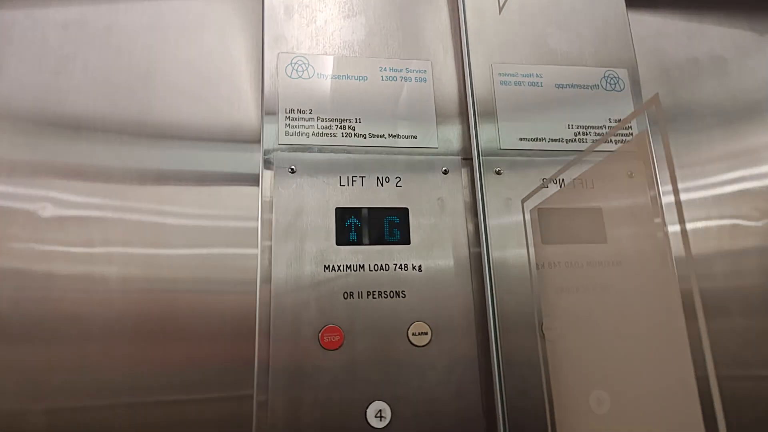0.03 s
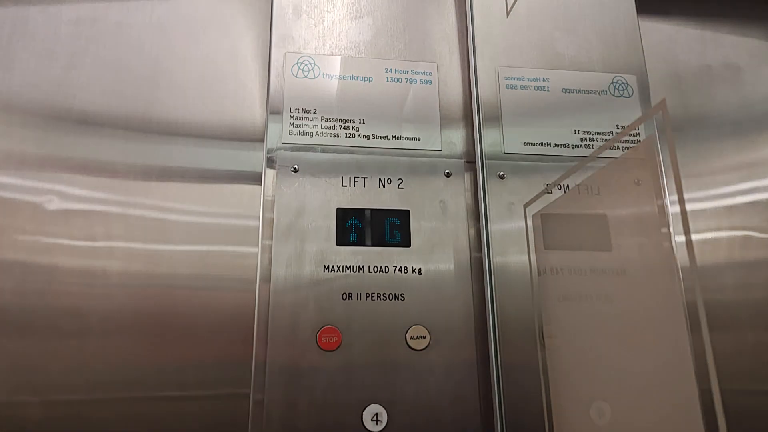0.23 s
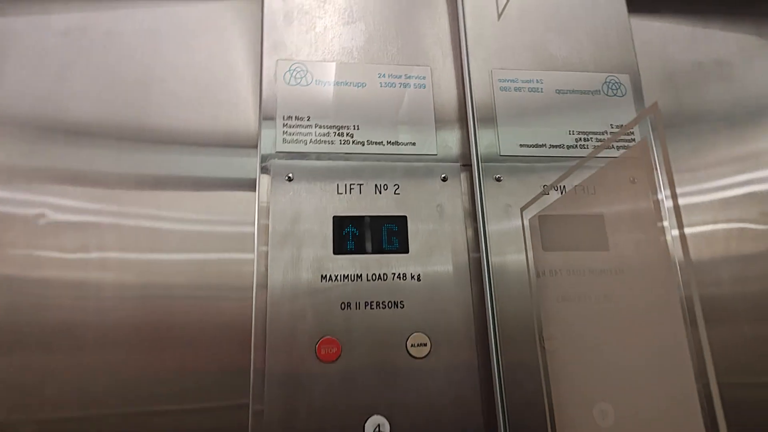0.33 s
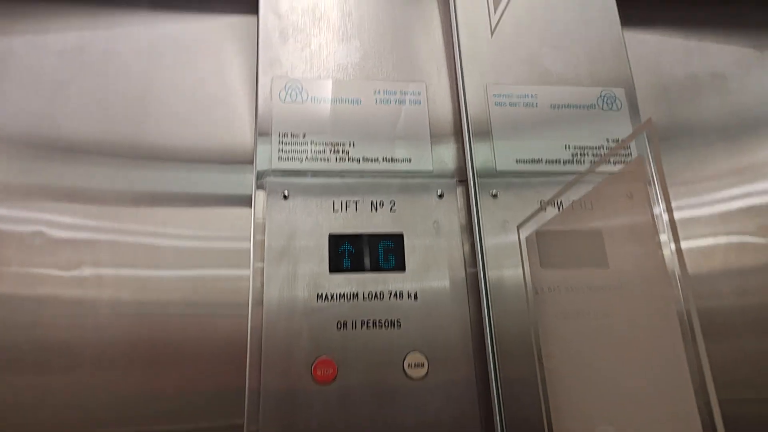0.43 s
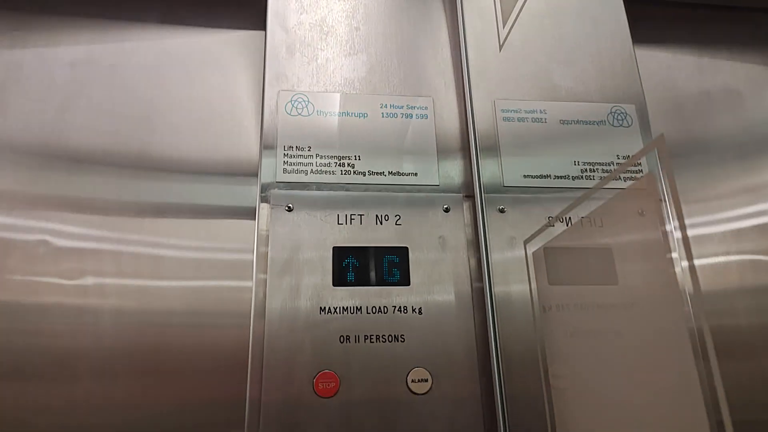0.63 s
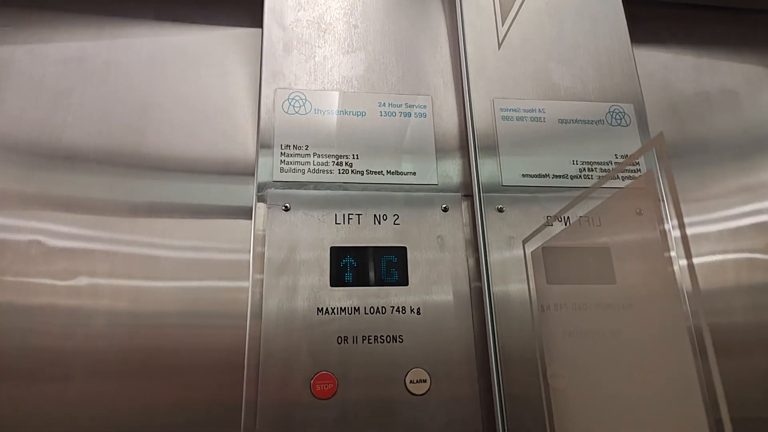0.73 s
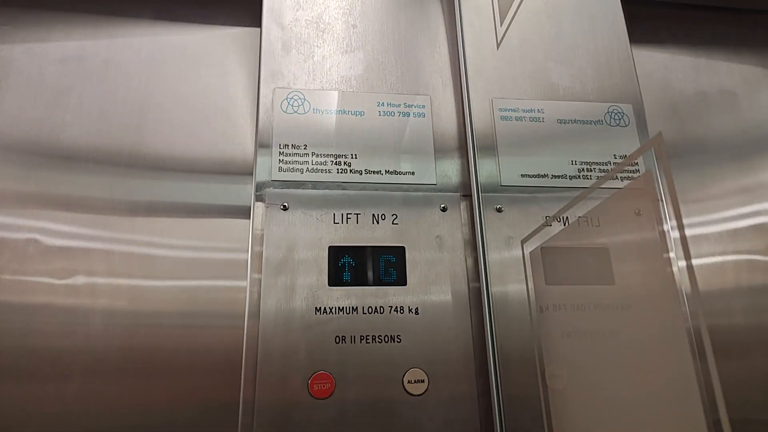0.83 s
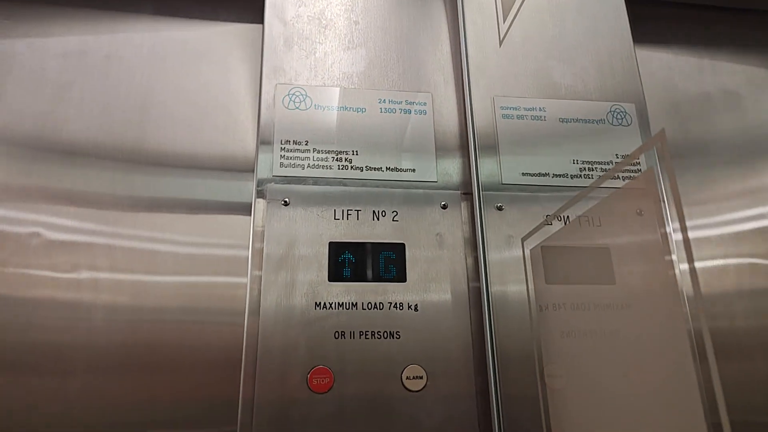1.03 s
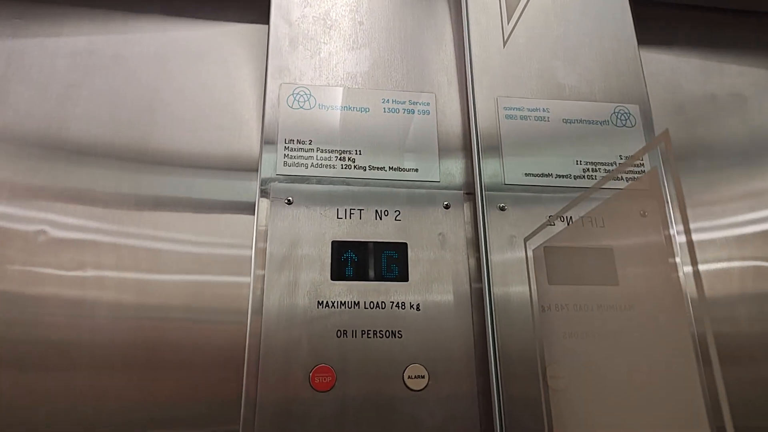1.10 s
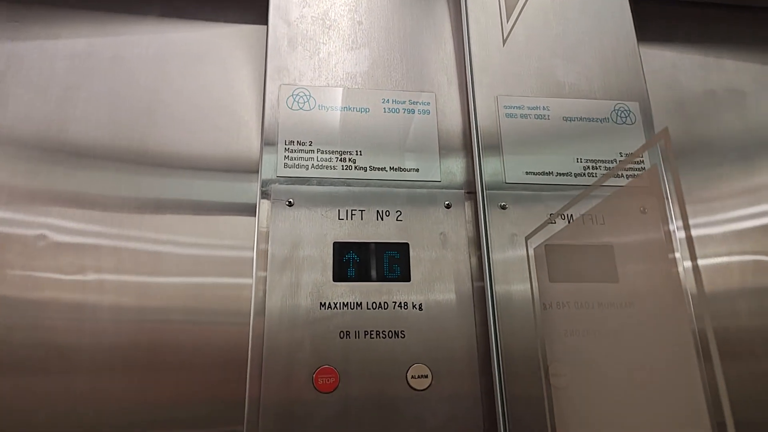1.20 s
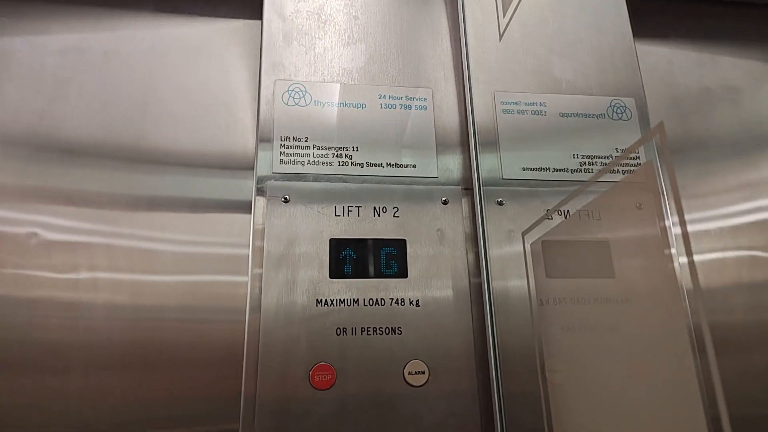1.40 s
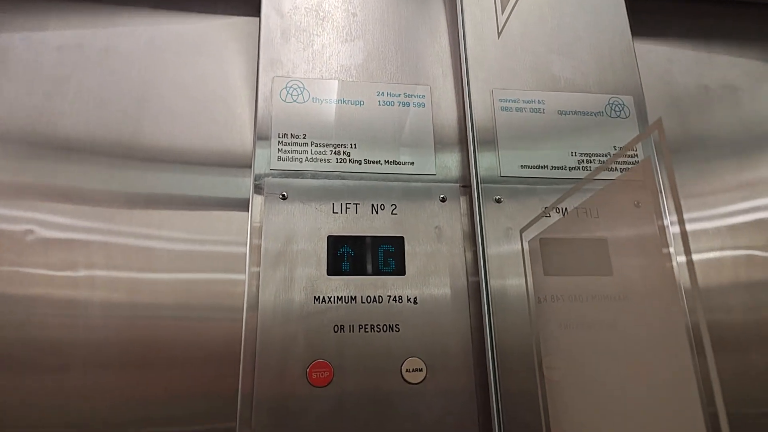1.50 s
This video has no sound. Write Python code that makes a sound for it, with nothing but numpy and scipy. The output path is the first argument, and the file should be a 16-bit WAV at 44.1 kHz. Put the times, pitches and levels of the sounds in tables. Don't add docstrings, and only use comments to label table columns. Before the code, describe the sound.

Elevator doors bang closed in two heavy clanking blows, then low swaying rumble and faint fan

```python
import sys
import numpy as np
from scipy import signal
from scipy.fft import rfft, irfft
from scipy.io import wavfile
from scipy.ndimage import uniform_filter1d

SR = 44100
rng = np.random.default_rng(int(sys.argv[2]) if len(sys.argv) > 2 else 0)


def inscribe(sig):
    pcm = np.round(np.clip(np.atleast_2d(sig).T, -1, 1) * 32767)
    wavfile.write(sys.argv[1], SR, pcm.astype(np.int16))


def rack_gain(trim_db):
    fader = np.asarray(trim_db, float)
    return 10 ** (fader / 20)


N = 68355

# [t/s, panel thud level/dB, mid crash level/dB, treble rattle level/dB, crash t60/s]
DOOR_BLOWS = [(0.144, -44, -50.5, -60, 0.57), (0.177, -39.5, -46.5, -35.5, 0.34),
              (0.196, -23, -37.5, -35.5, 0.44), (0.213, -9.5, -17, -15, 0.44),
              (.236, -14, -21, -27.5, 0.25), (0.257, -11, -35.5, -22.5, 0.22),
              (0.304, -12, -29.5, -33, 0.42), (0.388, -8, -17.5, -16.5, 0.19),
              (0.4, -17.5, -18.5, -16, 0.39), (.447, -17.5, -21.5, -13.5, 0.33),
              (0.465, -30, -25.5, -21, 0.47), (0.496, -18.5, -30, -25.5, 0.52),
              (0.535, -26, -26, -17.5, 0.4), (.572, -26.5, -73, -47, 1), (0.624, -25.5, -69, -69, .6)]
# [f/Hz, level/dB, t60/s]
PANEL_MODES = [(69.25, -7, 0.52), (86.6, -7.5, 0.52), (196.6, -10.5, 0.55), (226.8, -16.5, 0.73),
               (250.6, -10, 0.61), (286.9, -1, 0.35), (342.3, -14.5, 0.44), (425, -12.5, 0.27),
               (532.4, -9, 0.081), (638, -7, 0.31), (694, -3.5, 0.075), (812, -14, .15), (931, -6.5, 0.11),
               (1066, -20, 0.2)]
# [f/Hz, level/dB]
CRASH_COLOUR = [(150, -15.5), (300, 11.5), (700, 0), (1200, 3), (2200, 1.5), (3500, -4), (6000, -1),
                (11000, -3)]
# [centre t/s, length/s, f/Hz, level/dB]
ROPE_LURCHES = [(0.253, 0.075, 41.8, -9), (0.319, 0.17, 31.6, -18.5), (0.445, 0.15, 40.6, -14),
                (0.529, 0.19, 39.8, -11.5), (0.642, 0.066, 38.4, -5), (0.697, 0.088, 35.5, -15.5),
                (0.771, 0.074, 29.3, -18.5), (.84, 0.1, 35.9, -16.5), (0.903, 0.077, 35.4, -17),
                (0.958, 0.073, 39.6, -28), (1.024, 0.12, 35.3, -31), (1.084, 0.091, 36.7, -26.5),
                (1.145, 0.082, 39.7, -27), (1.209, 0.037, 33.3, -33), (1.258, 0.059, 38, -32),
                (1.319, 0.053, 34.9, -42)]
# [centre t/s, length/s, f/Hz, level/dB]
AIR_BOOMS = [(.25, 0.046, 141, -24.5), (.33, 0.16, 135.7, -23), (.405, 0.034, 141, -17),
             (.485, 0.11, 135, -15.5), (.57, 0.14, 135.8, -21), (.66, .12, 136.2, -24.5),
             (.74, 0.24, 149, -39), (.83, 0.13, 149.4, -41.5), (1.0, 0.31, 141, -57)]
# [t/s, centre f/Hz, width/Hz, peak level/dB]
METAL_TICKS = [
    (.095, 1800, 3500, -42),
    (.192, 600, 500, -33),
    (.888, 8500, 2500, -46),
    (1.0905, 900, 1700, -45),
]
# [t/s, length/s, centre f/Hz, width/Hz, level/dB]
RUSTLES = [
    (.094, .02, 2500, 5000, -58),
    (.96, .1, 1600, 900, -66),
    (1.508, .05, 2400, 2200, -60),
    (1.096, .04, 5300, 1800, -65),
    (1.118, .021, 4200, 2400, -59),
]
# [f/Hz, level/dB per Hz]
FAN_COLOUR = [(20, -14), (32, -1), (80, -12.5), (150, -15), (200, -20), (500, -22), (870, -31), (3500, -40)]
# [t/s, level/dB]
FLOOR_GAIN = [(0, 8), (.2, 5), (.7, -10), (.9, -3), (1.0, -1), (1.07, -4.5), (1.2, -5), (1.32, 3),
              (1.55, -2)]
# [f/Hz, level/dB]
LEFT_PORT = [(100, 1), (600, 0), (3000, -0.5), (4600, 3), (5400, 6.5), (6500, -4.5), (8500, -34.5),
             (11000, -52)]
# [f/Hz, level/dB]
RIGHT_PORT = [(300, 1.5), (2500, 3.5), (4200, -1.5), (6000, -14), (7300, -1), (8500, 8), (9800, -3),
              (10700, -23.5)]


def curve(table, t):
    return np.interp(t, *np.array(table, float).T)


def colour(x, table):
    n = 1 << 17
    rows = np.array(table, float)
    hz = np.arange(n // 2 + 1) * SR / n
    db = np.interp(np.log(hz + 1), np.log(rows[:, 0]), rows[:, 1])
    cepstrum = irfft(db * np.log(10) / 20, n)
    cepstrum[1:n // 2] *= 2
    cepstrum[n // 2 + 1:] = 0
    return irfft(rfft(x, n) * np.exp(rfft(cepstrum)), n)[..., :N]


def cut(x, order, hz, kind):
    return signal.sosfilt(signal.butter(order, hz, kind, fs=SR, output="sos"), x)


def band(x, hz, width_hz):
    low_hz = max(np.sqrt(hz ** 2 + width_hz ** 2 / 4) - width_hz / 2, 10)
    return cut(x, 2, [low_hz, min(low_hz + width_hz, SR / 2.2)], "band")


def unit(x):
    return x / np.sqrt(np.mean(x ** 2))


def walk(rate_hz):
    k = int(SR / rate_hz)
    return unit(uniform_filter1d(uniform_filter1d(rng.standard_normal(N), k), k))


def pair(alike_hz):
    mid, side = rng.standard_normal((2, N))
    side = cut(side, 2, alike_hz, "high")
    return np.array([mid - side, mid + side]) / np.sqrt(2)


def decay(t, start, rise, t60):
    u = np.maximum(t - start, 0)
    return (1 - np.exp(-u / rise)) * np.exp(-np.log(1000) * u / t60)


def blow_level(t, column, rise, t60s):
    power = sum((rack_gain(b[column]) * decay(t, b[0], rise, t60)) ** 2 for b, t60 in zip(DOOR_BLOWS, t60s))
    return np.sqrt(power)


def swells(t, table, sag):
    out, level = np.zeros(N), np.zeros(N)
    for mid, length, hz, db in table:
        u = t - mid
        bell = rack_gain(db) * np.exp(-2 * (u / (length / 2)) ** 2)
        out += np.sqrt(2) * bell * np.cos(2 * np.pi * hz * u * (1 - sag * u / length))
        level += bell
    return out, level


def panels(t):
    thud_s, knock_hz, knock_db, side_hz = 0.0058, 480, 8.5, 700
    waver_db, waver_rad = 3.5, 0.71
    clamp_s, clamp_t60_s = 0.57, 1
    ring = np.zeros((2, N))
    push = np.array([decay(t, b[0], thud_s / 4, thud_s * 4) for b in DOOR_BLOWS])
    chance = rng.standard_normal((len(DOOR_BLOWS), 3 * len(PANEL_MODES)))
    for k, (hz, db, t60) in enumerate(PANEL_MODES):
        phase, strength, place = chance[:, 3 * k:3 * k + 3].T
        force = rack_gain(np.array([b[1] if hz < knock_hz else b[2] + knock_db for b in DOOR_BLOWS]))
        hit = force * np.exp(.6j * phase) * rack_gain(2.6 * strength)
        skew = np.exp(1j * np.outer([-1, 1], place) * (hz / side_hz) ** 2)
        drive = (skew * hit) @ push * np.exp(2j * np.pi * hz * t) / (thud_s * SR / 2)
        pole = np.exp(2j * np.pi * hz / SR - np.log(1000) / (t60 * SR))
        waver = rack_gain(waver_db * walk(30)) * np.exp(1j * waver_rad * walk(30))
        ring += rack_gain(db) * (signal.lfilter([1], [1, -pole], drive) * waver).imag
    rumble = blow_level(t, 1, thud_s, [0.6] * len(DOOR_BLOWS))
    rumble = rack_gain(-13) * rumble * unit(band(pair(980), 296, 407))
    return rack_gain(-5 - 60 * np.maximum(t - clamp_s, 0) / clamp_t60_s) * ring + rumble


def crash(t):
    split_hz, bottom_hz, rise_s = 6380, 299, .002
    stop_s, stop_t60_s, patchy_db = 0.63, 1, 0.5
    mids = cut(colour(pair(290), CRASH_COLOUR), 4, split_hz, "low")
    treble = cut(colour(pair(290), CRASH_COLOUR), 4, split_hz, "high")
    mids = cut(mids, 2, bottom_hz, "high")
    stop = rack_gain(-60 * np.maximum(t - stop_s, 0) / stop_t60_s)
    mid_level = blow_level(t, 2, rise_s, [b[4] * 1.082 for b in DOOR_BLOWS])
    treble_level = blow_level(t, 3, rise_s, [b[4] * 0.6 for b in DOOR_BLOWS])
    mids = unit(mids) * stop * mid_level * rack_gain(patchy_db * walk(60))
    return mids + unit(treble) * treble_level * rack_gain(patchy_db * walk(140))


def sway(t):
    shudder_hz, shudder_width_hz, shudder_db = 81.4, 30, -20
    lag_s, follow_power = .06, 0.77
    lurch, level = swells(t, ROPE_LURCHES, 0.25)
    frame = band(rng.standard_normal(N), shudder_hz, shudder_width_hz)
    frame = band(frame, shudder_hz, shudder_width_hz)
    follow = np.maximum(uniform_filter1d(level, int(lag_s * SR)), 0) ** follow_power
    shudder = rack_gain(shudder_db) * follow * unit(frame)
    boom = swells(t, AIR_BOOMS, 0)[0]
    spread = rack_gain(-21) * unit(band(rng.standard_normal(N), 50, 60)) * level
    return lurch + shudder + boom + np.outer([1, -1], spread)


def door_drive(t):
    motor_hz, motor_db, stop_s, fade_s = 100.4, -36, .055, .014
    roll_hz, roll_width_hz, roll_db, roll_end_s = 2220, 1400, -59.5, .21
    hum = np.sin(2 * np.pi * motor_hz * t) + 0.11 * np.sin(np.pi * motor_hz * t)
    hum *= rack_gain(motor_db + 2.6 * walk(30.8)) * np.exp(-np.maximum(t - stop_s, 0) / fade_s)
    roll = unit(band(pair(500), roll_hz, roll_width_hz))
    roll *= rack_gain(roll_db + 5.5 * walk(40)) * (t < roll_end_s)
    return np.sqrt(2) * hum + roll


def ticks(t):
    out = np.zeros((2, N))
    for start, length, hz, width_hz, db in RUSTLES:
        u = (t - start) / length
        shape = np.clip(u * 4.5, 0, 1) * np.exp(-np.maximum(u - 1, 0) * 9.0)
        out += rack_gain(db) * shape * unit(band(pair(555), hz, width_hz))
    for start, hz, width_hz, db in METAL_TICKS:
        click = band((np.arange(N) == int(start * SR)) * 1., hz, width_hz)
        tail = .3 * decay(t, start, .001, .025) * unit(band(pair(600), hz, width_hz))
        out += rack_gain(db) * (click / np.abs(click).max() + tail)
    return out


def air(t):
    fan_db, hiss_db = -53, -60.5
    gain_db = curve(FLOOR_GAIN, t)
    fan = unit(colour(pair(450), list(FAN_COLOUR) + [(7000, -59)])) * rack_gain(fan_db + 0.54 * walk(24))
    hiss = unit(band(pair(300), 7600, 6400)) * rack_gain(hiss_db + gain_db + 0.75 * walk(42))
    return fan * rack_gain(0.53 * gain_db) + hiss


def scene():
    t = np.arange(N) / SR
    return panels(t) + crash(t) + sway(t) + door_drive(t) + ticks(t) + air(t)


def low_pass(x):
    return signal.sosfilt(signal.butter(12, 10730, fs=SR, output="sos"), x)


def record(dry):
    limit, top_hz = 1.25, 10750
    x = np.array([colour(dry[0], LEFT_PORT), colour(dry[1], RIGHT_PORT)])
    x = limit * np.tanh(x / limit)
    x = signal.sosfilt(signal.ellip(10, .3, 60, top_hz, fs=SR, output="sos"), x)
    return low_pass(x)


dry = scene()
out = record(dry)
inscribe(out)
```